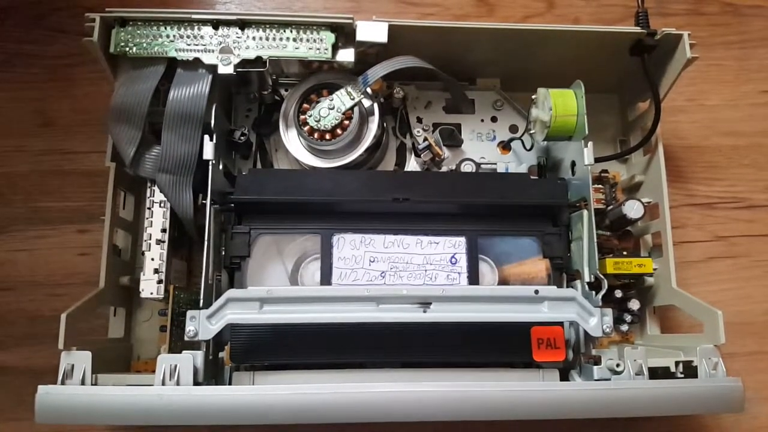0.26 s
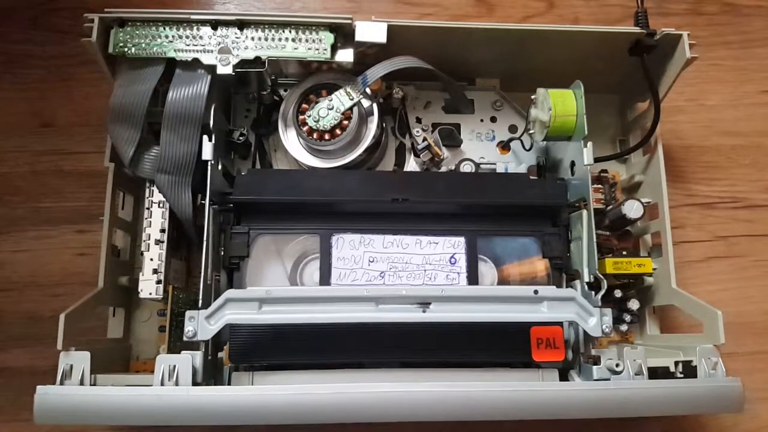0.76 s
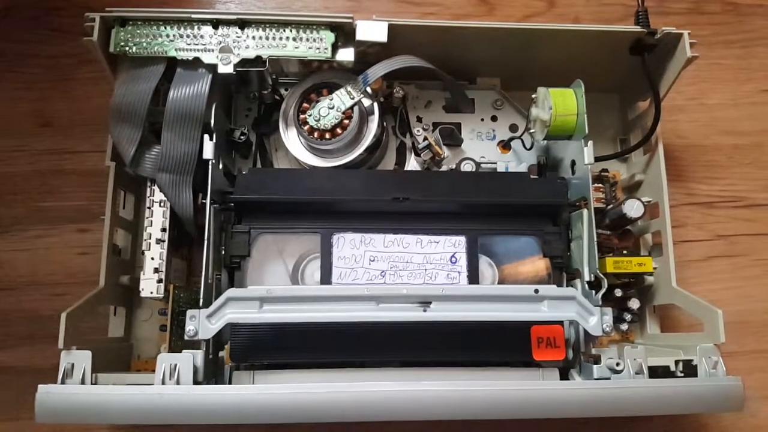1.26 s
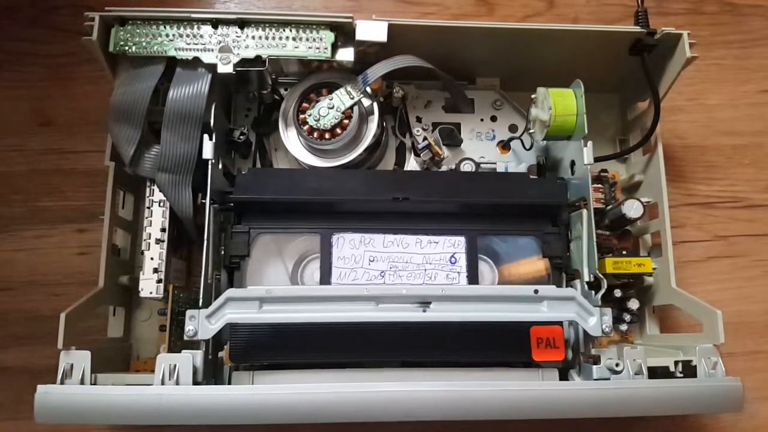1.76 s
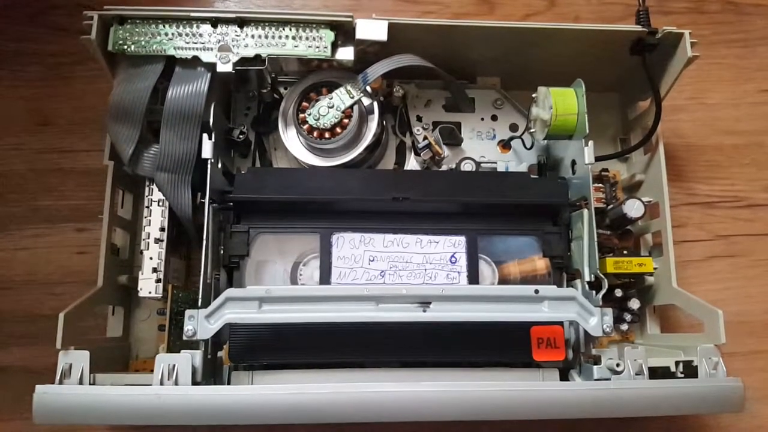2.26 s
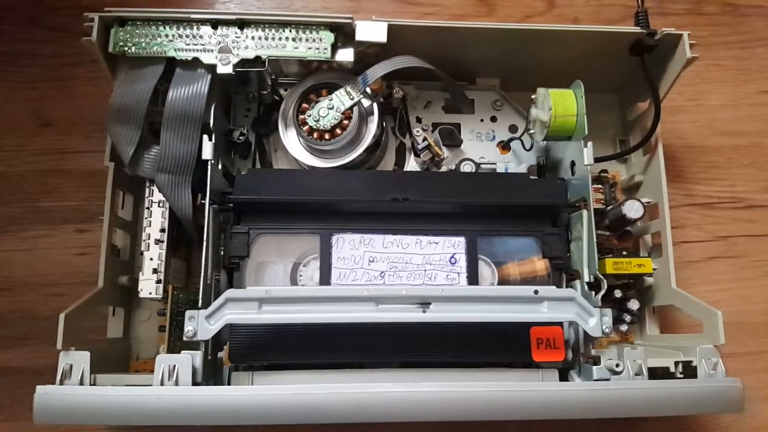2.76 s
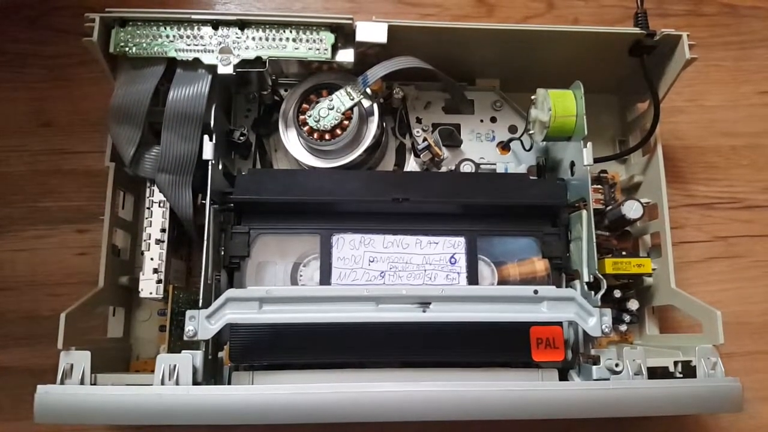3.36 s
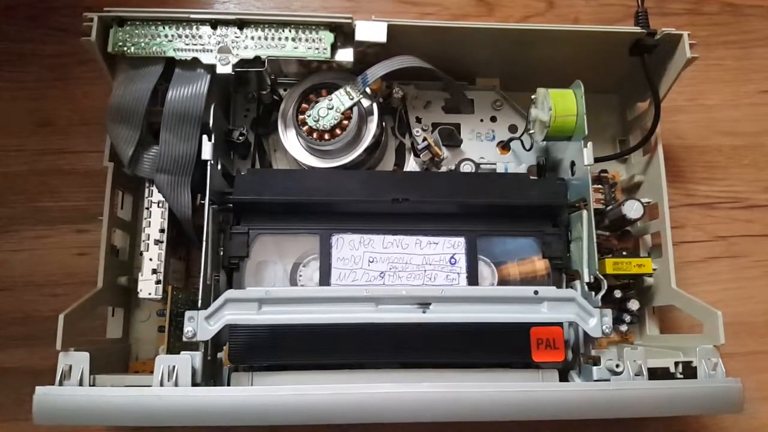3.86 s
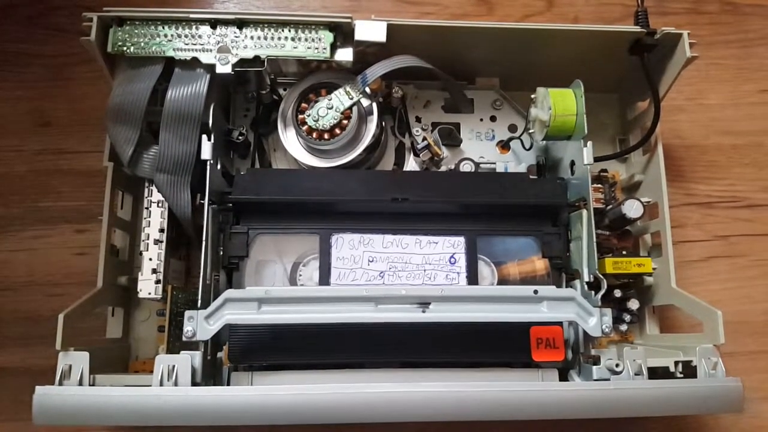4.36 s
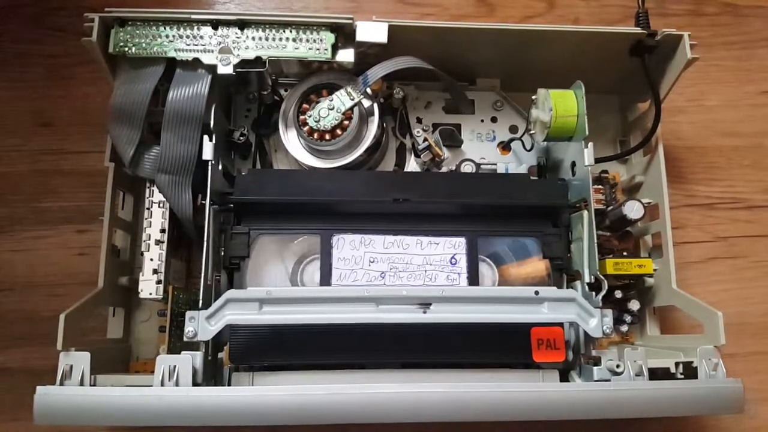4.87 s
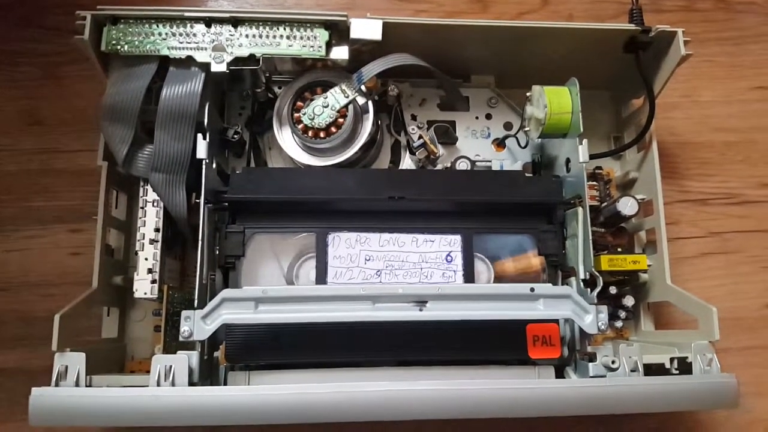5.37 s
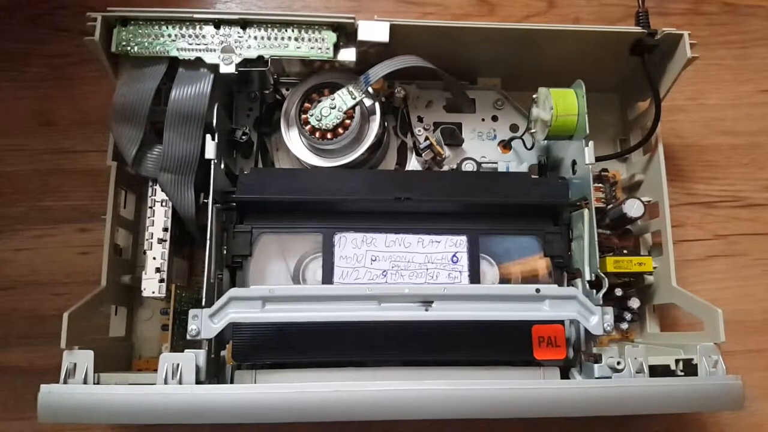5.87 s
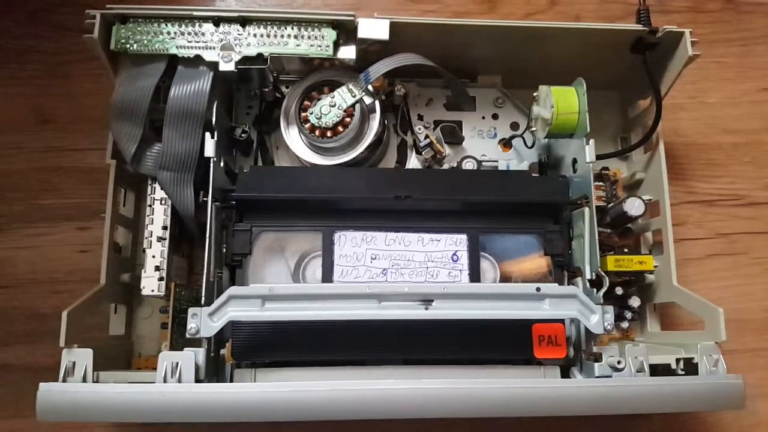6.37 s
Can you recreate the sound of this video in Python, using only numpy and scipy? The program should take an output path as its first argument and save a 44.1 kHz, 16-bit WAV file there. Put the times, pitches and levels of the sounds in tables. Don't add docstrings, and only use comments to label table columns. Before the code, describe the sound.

Loud whirring tape rewind stops abruptly in clacks, leaving a faint buzzing hum; a small motor shifts twice, a latch snaps, and slow ticking winding begins.

```python
import sys
import numpy as np
from scipy import signal
from scipy.fft import rfft, irfft, next_fast_len
from scipy.io import wavfile
from scipy.ndimage import uniform_filter1d

SR = 44100
rng = np.random.default_rng(int(sys.argv[2]) if len(sys.argv) > 2 else 0)


def to_wav(sig):
    pcm = np.clip(np.atleast_2d(sig), -1, 1) * 32767
    pcm = np.round(pcm).astype(np.int16)
    wavfile.write(sys.argv[1], SR, pcm.T)


def attenuation_scalar(level_db):
    decades = np.asarray(level_db, float) / 20
    return 10 ** decades


N = 292065
TIME = np.arange(N) / SR
SIZE = next_fast_len(N + 8192)
HZ = np.fft.rfftfreq(SIZE, 1 / SR)

# (frequency [Hz], level [dB per Hz])
FAST_WASH = [(35, -37), (70, -39), (200, -20), (470, -16), (800, -11.5), (1200, -7), (1900, -9.5),
             (2300, -14), (3500, -20), (6800, -26), (8000, -22), (10000, -35.5), (15800, -47)]
CHASSIS_HZ = [124, 237, 334, 375, 411, 546, 640, 704, 760, 884, 935, 1075, 1150, 1245, 1325, 1440, 1476,
              1606, 1820, 2630, 3010]
# (width [Hz], level [dB])
CHASSIS_SHAPES = [(12, -20.5), (25.4, -16.5), (28, -3), (14.2, -5.5), (14, -10.5), (30.4, -2), (49.7, -3.5),
                  (30.4, -3), (30, -11), (34, -1.5), (35.8, -3), (40, -4.5), (36, -16.5), (30, -25),
                  (29.5, -6.5), (50, -9), (24, -2), (36, -10), (149, -8), (36, -17), (89, -17)]
# (pitch at the start [Hz], sag [Hz per s], full from [s], level [dB], chop by the wobble [dB])
GEARS = [(576, 24.5, .6, -47.5, 2.5), (1152, 49., 0, -56, 3.), (1095, 17., 1.15, -43.5, 5.),
         (728, 26., .4, -51, 2.5), (945, 40., 0, -56, 3.), (890, 11., .9, -52, 2.5),
         (336, 1., 1.3, -55, 3.)]
# (frequency [Hz], level [dB per Hz])
TAPE_HISS = [(6000, -20), (9500, -5), (12000, 9), (14500, 6), (15800, -3)]
FAST_DB, BRAKE_S, RUN_DOWN_DB_PER_S = -34.5, 2.137, 166
MESH_DB_PER_S, POWER_OFF_S = 30., 2.085
COAST_HZ, COAST_HZ_PER_S, COAST_DB = 1050, 5600., -43.
GEAR_SPREAD = .7
TAPE_DB, TAPE_SLACK_DB_PER_S = -60., 110.
PAD_S, PAD_WIDTH_S, PAD_DB = 2.16, .05, 10
TAKE_UP_S, TAKE_UP_WIDTH_S, TAKE_UP_DB = 4.82, .04, -63

# (frequency [Hz], level [dB])
DRUM = [(662.1, -79), (1001, -73), (1050, -73), (1104, -65), (1211, -73), (1249, -68), (1297, -71),
        (1324, -64), (1416, -70), (1432, -66), (1502, -73), (1588, -75), (1620, -73), (1653, -64),
        (1685, -70), (1760, -74), (1857, -68), (1873, -69), (2051, -80), (2121, -80), (2202, -76),
        (2250, -79), (2299, -73), (2401, -72), (2552, -83), (2842, -85), (3020, -83), (3106, -81),
        (3429, -86), (3650, -81)]
# (frequency [Hz], level [dB per Hz])
BUZZ = [(300, -27), (800, -14), (1200, 2.5), (1900, -11.5), (2400, 1.5), (3200, -20), (3700, -8.5),
        (4500, -13), (7000, -53)]
# (frequency [Hz], level [dB per Hz])
FLOOR_HISS = [(9, -28), (15, -35), (48, -10), (453, -22), (900, -14.5), (1500, -8.5), (1880, -12.5),
              (2000, -31), (3000, -19.5), (5700, -30.5), (10000, -34.5), (13500, -32.5), (15800, -37)]
# (frequency [Hz], width [Hz], level [dB])
DRUM_HOUSING = [(2260, 170, -8), (3120, 82, -12), (3650, 89, -13.5), (4600, 280, -21.5), (7850, 760, -27)]
MAINS_HZ, FIRST_TICK_S, BUZZ_DB, FLOOR_DB = 50, .0178, -67, -54.5
LOADED_DB, SUNK_DB = 7.5, -1.5

# (frequency [Hz], width [Hz], level [dB])
HUB = [(4550, 350, -9), (5280, 230, 0), (5800, 300, -4), (7800, 260, -5), (8050, 240, -6), (8800, 500, -13)]
# (time [s], peak level [dB])
TEETH = [(2.152, -36), (2.187, -44), (2.271, -37), (4.4927, -48), (4.506, -43), (4.5127, -42), (4.521, -41),
         (4.5317, -38), (4.5433, -41), (4.5544, -42), (4.5624, -46), (4.58, -37), (4.6597, -44),
         (4.6813, -45), (4.736, -48)]
# (time [s], peak level [dB])
SCRAPES = [(4.4987, -47), (4.7494, -50), (4.82, -43), (4.871, -39.5), (4.968, -41.5), (5.1316, -48),
           (5.247, -52), (5.355, -49), (5.478, -44.5), (5.635, -48), (5.8, -44.5), (5.882, -45.5),
           (6.022, -43.5), (6.245, -47), (6.27, -58), (6.374, -44.5)]
WOBBLES_PER_S, RATTLE_DB, RATTLE_END_S, SCRAPE_S = 25.5, -49, 2.175, 0.058

# (time [s], treble peak [dB], thud level [dB], decay t60 [s], top of the crack [Hz])
CLACKS = [(2.264, -46, -44.5, 0.19, 5940), (2.3191, -48, -44.5, 0.19, 5000), (2.3331, -38, -60, 0.16, 6870),
          (2.3488, -22.5, -36.5, 0.048, 10300), (2.3716, -43, -51.5, 0.19, 6000),
          (2.437, -49, -55, 0.36, 4000), (2.4673, -31.5, -50, 0.074, 4900),
          (2.5155, -41, -48.5, 0.062, 6500), (3.759, -52, -49, 0.078, 5000), (3.8794, -44, -54, 0.14, 4000),
          (4.5201, -63, -48, 0.24, 6000), (4.6067, -26.5, -38, 0.033, 15300), (4.7594, -39, -52, .04, 4300)]
# (frequency [Hz], width [Hz], level [dB])
FRAME = [(230, 56, -8), (328, 47, -2.5), (510, 65, -1), (666, 72, 0), (900, 65, 5), (1060, 240, -4.5),
         (1700, 250, -1.5)]
CRACK_HZ = 3060

# (up to speed [s], cut [s], rumble level [dB], hiss level [dB])
SHIFTS = [
    (3.724, 4.083, -52.5, -57.5),
    (4.291, 4.415, -53.5, -58.5),
    (4.505, 4.616, -55.5, -63),
]
# (frequency [Hz], level [dB per Hz])
SHIFT_RUMBLE = [(47, -55), (80, -23), (342, -2), (451, -8), (886, -3.5), (950, -11), (1650, -1),
                (1800, -7.5), (5000, -28), (6500, -57), (11000, -120)]
# (frequency [Hz], level [dB per Hz])
BRUSH_WASH = [(2000, -18), (6000, -12.5), (10000, -16.5), (15800, -15)]
# (frequency [Hz], width [Hz], level [dB])
BRUSH_BODY = [(4700, 360, -9), (7600, 450, -3), (8570, 400, 1), (9300, 400, -6), (11600, 800, -10),
              (13300, 500, -4)]
RUMBLE_RISE, RUMBLE_FALL, HISS_RISE, HISS_FALL = 900., 300, 350., 510
HISS_LATE_S, HISS_EARLY_S = .035, .015
SHIFT_HZ, SHIFT_LAG_S, SHIFT_SING_S, SING_DB = 1716, .04, 3.87, -58.
HUM_HZ, HUM_DB = 885, -64.

# (frequency [Hz], level [dB per Hz])
SLOW_WASH = [(35, -45), (60, -37), (250, -3), (456, -11.5), (900, -5), (1100, -5.5), (1890, -5.5),
             (3810, -19), (5300, -18), (6600, -27), (7900, -19.5), (9200, -24.5), (10600, -32.5),
             (14300, -25), (15800, -33)]
# (frequency [Hz], width [Hz], level [dB])
SLOW_BODY = [(252, 7.8, -1), (403, 50, -6), (536, 94, -3.5), (655, 140, -5), (735, 33, -3), (912, 28, 0.5),
             (975, 48, -1), (1307, 47, -0.5)]
# (frequency [Hz], level [dB])
SLOW_HUM = [(123.8, -71), (253.0, -78), (382.2, -64), (527.6, -63.5), (651.4, -62), (759.0, -64.5),
            (877.5, -59)]
# (frequency [Hz], width [Hz], level [dB])
KNOCK_BODY = [(1878, 320, -0.5), (1957, 41, 4), (2207, 35, -2), (2612, 49, 1.5), (3010, 52, 0.5),
              (3280, 40, -3.5), (3810, 40, -19)]
# (frequency [Hz], level [dB])
KNOCK_RING = [(1885, -66), (2622, -64.5), (3040, -71)]
SLOW_DB, SLOW_S, PICK_UP_DB_PER_S, CREEP_DB_PER_S = -51, 4.914, 39, 0.6
KNOCKS_PER_S, KNOCK_LAG_S = 46.6, .45
SPIN_UP_HZ, SPIN_UP_HZ_PER_S, SPIN_UP_DB, SPIN_UP_END_S = 1800, 250., -58., 5.17
RING_S, RING_CHOP_DB = 5.0, 8.

# (frequency [Hz], likeness [0-1])
LIKENESS = [(30, .9), (70, .75), (150, .94), (800, .92), (1500, .6), (2800, .35), (5500, .42), (9000, .5),
            (14000, .33)]
# (frequency [Hz], scatter [radians])
SCATTER = [(60, .1), (300, .3), (800, .3), (1500, .4), (3000, .2), (15000, .15)]
# (frequency [Hz], left over right [dB])
TILT = [(60, 0.0), (150, 0.5), (380, 1.5), (950, -0.5), (2380, 1.0), (5980, 0.0), (15000, 3.0)]
# (frequency [Hz], lead [radians])
LEAD = [(0, 0), (200, .2), (1000, .5), (1890, 1.1), (2800, 1.6), (6000, 1.6), (9000, 2.1), (12000, 1.7),
        (16000, 1.6)]


def evened(x):
    return x / np.sqrt(np.mean(x ** 2) + 1e-30)


def read(points):
    f, value = np.transpose(points)
    return np.interp(np.log(HZ + 1), np.log(f + 1), value)


def modes(rows):
    return sum((-1) ** k * attenuation_scalar(db) / (1 + 2j * (HZ - f) / w) for k, (f, w, db) in enumerate(rows))


def humps(wash, body, wash_db):
    power = attenuation_scalar(2 * (read(wash) + wash_db))
    power = power + sum(attenuation_scalar(2 * db) / (1 + (2 * (HZ - f) / w) ** 2) ** 2 for f, w, db in body)
    return np.sqrt(power)


def colour(x, response):
    return irfft(rfft(x, SIZE) * response, SIZE)[..., :N]


def run_db(start, stop, rise, fall):
    return -rise * np.maximum(start - TIME, 0) - fall * np.maximum(TIME - stop, 0)


def wander(rate):
    hz = np.fft.rfftfreq(4096, N / SR / 4096)
    steps = irfft(rfft(rng.standard_normal(4096)) / (1 + (hz / rate) ** 4))
    return np.interp(TIME, np.linspace(0, N / SR, 4096), evened(steps))


def grit(per_s, spread_db):
    size = attenuation_scalar(spread_db * np.minimum(rng.exponential(1, (2, N)), 5))
    return size * rng.standard_normal((2, N)) * (rng.random((2, N)) < per_s / SR)


def reels(db, response, per_s, flutter_db):
    return attenuation_scalar(db + flutter_db * wander(27.0)) * evened(colour(grit(per_s, 0.2), response))


def whine(hz, db, blur_hz):
    turns = np.cumsum(hz + blur_hz * wander(25.3)) / SR
    return attenuation_scalar(db + 1.3 * wander(32.0)) * np.sqrt(2) * np.sin(2 * np.pi * turns)


def lines(rows, waver_db, slip):
    total = 0
    for f, db in rows:
        wave = np.sin(2 * np.pi * f * TIME + slip * wander(3.1) + 7 * rng.random())
        total = total + attenuation_scalar(db + waver_db * wander(3.6)) * np.sqrt(2) * wave
    return total


def fast_winding():
    body = humps(FAST_WASH, [(f, *shape) for f, shape in zip(CHASSIS_HZ, CHASSIS_SHAPES)], -1.64)
    effort = run_db(0, BRAKE_S, 0, RUN_DOWN_DB_PER_S)
    wobble = np.cos(2 * np.pi * WOBBLES_PER_S * TIME + 2.7)
    speed = np.clip(1 - COAST_HZ_PER_S / COAST_HZ * (TIME - POWER_OFF_S), 0, 1)
    blur_hz = 3.5 + 60 * (1 - speed)
    whines = 0
    for hz, sag, full_s, db, chop_db in GEARS:
        load_db = run_db(full_s, POWER_OFF_S + .02, MESH_DB_PER_S, 320.)
        whines = whines + whine((hz - sag * TIME) * speed, db + chop_db * wobble + load_db, blur_hz)
    coast_db = COAST_DB + 3. * wander(80.) + run_db(POWER_OFF_S, BRAKE_S + .02, 1500., 350.)
    coast = whine(COAST_HZ * speed, coast_db, 50.)
    tones = (whines + colour(coast, body)) * [[1], [GEAR_SPREAD]]
    hiss = evened(colour(grit(9000., 1.2), attenuation_scalar(read(TAPE_HISS))))
    pad_db = PAD_DB * np.exp(-((TIME - PAD_S) / PAD_WIDTH_S) ** 2)
    tape_db = TAPE_DB + pad_db + run_db(0, PAD_S, 0, TAPE_SLACK_DB_PER_S)
    take_up = attenuation_scalar(TAKE_UP_DB) * np.exp(-((TIME - TAKE_UP_S) / TAKE_UP_WIDTH_S) ** 2)
    return reels(FAST_DB + effort, body, 14000., 0.89) + tones + (attenuation_scalar(tape_db) + take_up) * hiss


def idle():
    free, locked = [], []
    for f, db in DRUM:
        near_harmonic = abs((f / MAINS_HZ + .5) % 1 - .5) < .07
        (locked if near_harmonic else free).append((f, db))
    drum = lines(free, 1.5, 0.15)
    mains = lines(locked, 0.79, 0.11)
    ticks = np.zeros(N)
    at = np.arange(FIRST_TICK_S, N / SR, 1 / MAINS_HZ)
    ticks[(at * SR).astype(int)] = attenuation_scalar(1.0 * rng.standard_normal(len(at)))
    buzz = attenuation_scalar(BUZZ_DB) * evened(colour(ticks, attenuation_scalar(read(BUZZ))))
    floor = colour(rng.standard_normal((2, N)), humps(FLOOR_HISS, DRUM_HOUSING, 0))
    hiss = attenuation_scalar(FLOOR_DB - 3.0) * evened(floor)
    load_db = LOADED_DB * attenuation_scalar(run_db(0, BRAKE_S, 0, RUN_DOWN_DB_PER_S))
    load_db = load_db + SUNK_DB * np.clip((TIME - SHIFTS[0][0]) / 0.45 + 1, 0, 1)
    return attenuation_scalar(load_db) * (drum + mains + buzz) + hiss


def rattle():
    wobble = np.cos(2 * np.pi * WOBBLES_PER_S * TIME + .3 * wander(4.))
    drive = attenuation_scalar(RATTLE_DB + run_db(0, RATTLE_END_S, 0, 220.) + 5.5 * wobble + 1.5 * wander(20.))
    for s, db in SCRAPES:
        swell = np.sin(np.pi * np.clip((TIME - s) / SCRAPE_S, 0, 1)) ** 0.6
        drive = drive + attenuation_scalar(db - 11.5) * swell
    teeth = np.zeros(N)
    for s, db in TEETH:
        teeth[round(s * SR)] = attenuation_scalar(db)
    ring = modes(HUB)
    strike = abs(irfft(ring, SIZE)).max()
    loose = grit(2500., 1.0)
    ticking = colour(loose * drive, ring) / colour(loose, ring).std()
    return ticking + colour(teeth, ring + 0.062) / strike


def clacks():
    t = np.arange(8000) / SR
    hz = np.fft.rfftfreq(len(t), 1 / SR)
    cracks, thuds = np.zeros((2, N)), np.zeros((2, N))
    peak = 1.4 + 1 / (1 + ((hz - CRACK_HZ) / 620.0) ** 2)
    low_cut = hz ** 2 / (hz ** 2 + 1200.0 ** 2)
    for s, db, thud_db, t60, top_hz in CLACKS:
        at = round(s * SR)
        noise = rng.standard_normal((3, 2, len(t)))
        shape = peak * low_cut / (1 + (hz / top_hz) ** 6)
        burst = evened(irfft(rfft(noise[0, 0] + 0.13 * noise[1]) * shape, len(t)))
        decay_db = -60 * t / max(t60, .01)
        fall = attenuation_scalar(decay_db) + attenuation_scalar(-27.0 - 60 * t / 0.53)
        cracks[:, at:at + len(t)] += attenuation_scalar(db - 11.0) * burst * fall * (1 - np.exp(-t / 0.00016))
        thuds[:, at:at + len(t)] += attenuation_scalar(thud_db + decay_db) * noise[2, 0] * (1 - np.exp(-t / 0.00045))
    frame = modes(FRAME)
    return cracks + colour(thuds, frame) / np.sqrt(np.mean(abs(frame) ** 2))


def shifter():
    rumble = evened(colour(grit(3000., 0.92), attenuation_scalar(read(SHIFT_RUMBLE))))
    hiss = evened(colour(grit(9000., 0.87), humps(BRUSH_WASH, BRUSH_BODY, 0)))
    moves = 0
    for on, off, rumble_db, hiss_db in SHIFTS:
        moves = moves + attenuation_scalar(rumble_db + run_db(on, off, RUMBLE_RISE, RUMBLE_FALL)) * rumble
        brushes = run_db(on + HISS_LATE_S, off - HISS_EARLY_S, HISS_RISE, HISS_FALL)
        moves = moves + attenuation_scalar(hiss_db + brushes) * hiss
    on, off = SHIFTS[0][:2]
    speed = 1 - np.exp(-np.maximum(TIME - on, 0) / SHIFT_LAG_S)
    singing = run_db(SHIFT_SING_S, off, 170., 600.)
    song = whine(SHIFT_HZ * speed, SING_DB + singing, 2.3)
    return moves + song + whine(HUM_HZ * speed, HUM_DB + singing, 2.9)


def slow_winding():
    latch = CLACKS[-2][0]
    effort = run_db(SLOW_S, N, PICK_UP_DB_PER_S, 0) + CREEP_DB_PER_S * (TIME - SLOW_S)
    effort = np.where(TIME > latch, effort, -120)
    rate = KNOCKS_PER_S * (1 - .2 * np.exp(-np.maximum(TIME - latch, 0) / KNOCK_LAG_S))
    since = (np.cumsum(rate) / SR + .35) % 1
    blow = np.diff(since, prepend=0) < 0
    blows = grit(6000., 1.3) * (np.exp(-since / 0.2) + 0.15) + 14 * blow
    knocks = evened(colour(blows * attenuation_scalar(1. * wander(7.7)), modes(KNOCK_BODY)))
    chop_db = RING_CHOP_DB * np.cos(2 * np.pi * (since - .15))
    rising_hz = SPIN_UP_HZ + SPIN_UP_HZ_PER_S * np.clip(TIME - SLOW_S, -1, 1)
    rising = whine(rising_hz, SPIN_UP_DB + chop_db + run_db(SLOW_S, SPIN_UP_END_S, 90., 130.), 9.)
    ringing = attenuation_scalar(run_db(RING_S, N, 60., 0) + chop_db) * lines(KNOCK_RING, 1.7, 1.5)
    hum = attenuation_scalar(effort - 2.0) * lines(SLOW_HUM, 1.35, 1.6)
    shaking = reels(SLOW_DB + 4.0 + effort, humps(SLOW_WASH, SLOW_BODY, -2.3), 6000., 0.91)
    return shaking + attenuation_scalar(SLOW_DB - 5.0 + effort) * knocks + hum + rising + ringing


def two_ports(deck):
    a, b = rfft(deck, SIZE)
    scatter = rng.standard_normal(len(HZ))
    for _ in range(2):
        scatter = uniform_filter1d(scatter, size=4000)
    phase = read(LEAD) + read(SCATTER) * evened(scatter)
    turn = np.exp(.5j * phase) * attenuation_scalar(read(TILT) / 2)
    lean = np.arccos(np.clip(read(LIKENESS), 0, 1)) / 2
    common = np.cos(lean) * (a + b) / np.sqrt(2)
    apart = np.sin(lean) * (a - b) / np.sqrt(2)
    return irfft(np.array([(common + apart) * turn, (common - apart) / turn]), SIZE)[:, :N]


def scene():
    return two_ports(fast_winding() + idle() + rattle() + clacks() + shifter() + slow_winding())


def top_cut(x):
    return signal.sosfilt(signal.butter(12, 16410, fs=SR, output="sos"), x)


def record(dry):
    mix = colour(dry, HZ < 15780) - .0006
    return top_cut(mix)


dry = scene()
out = record(dry)
to_wav(out)
```